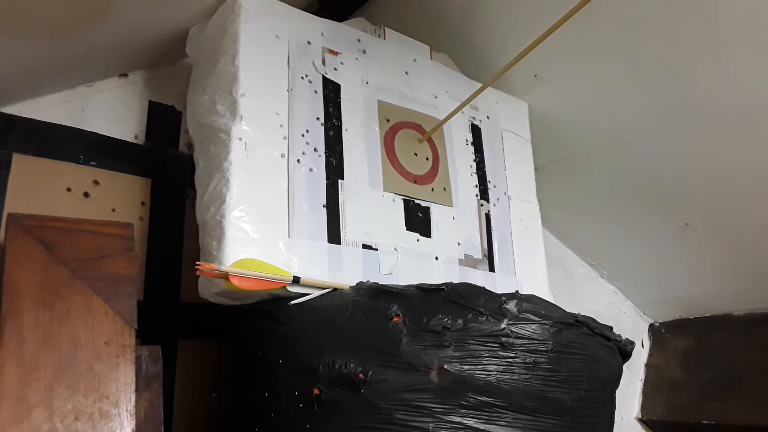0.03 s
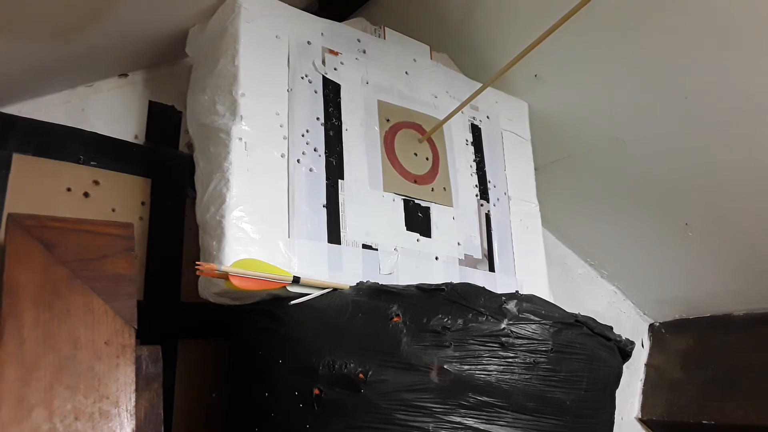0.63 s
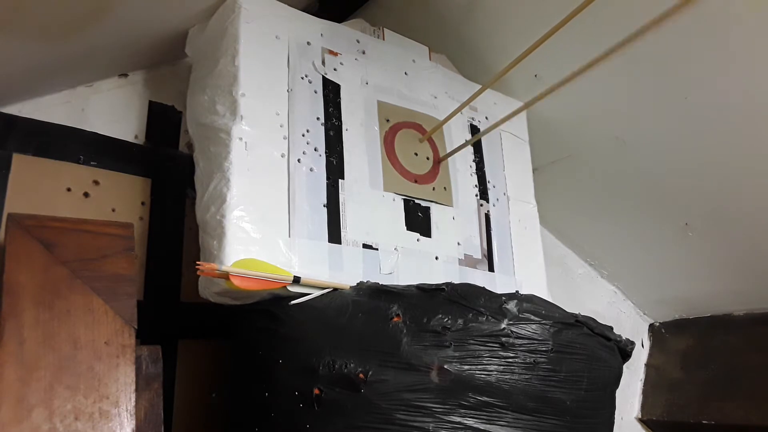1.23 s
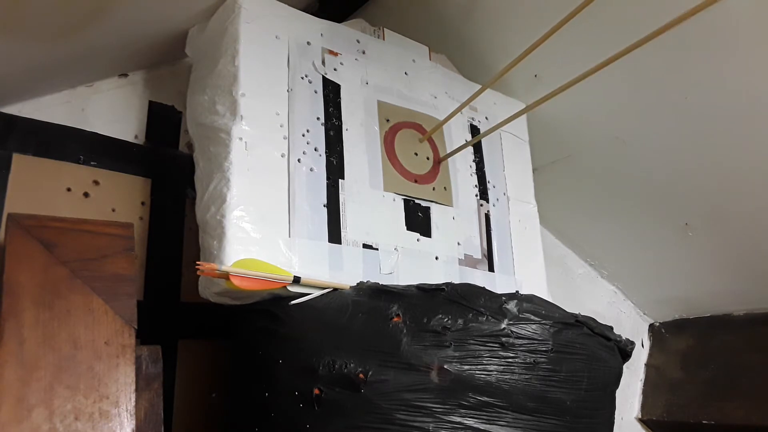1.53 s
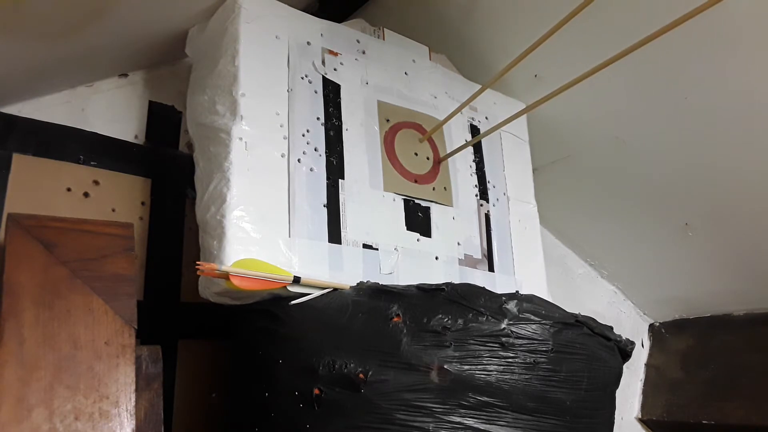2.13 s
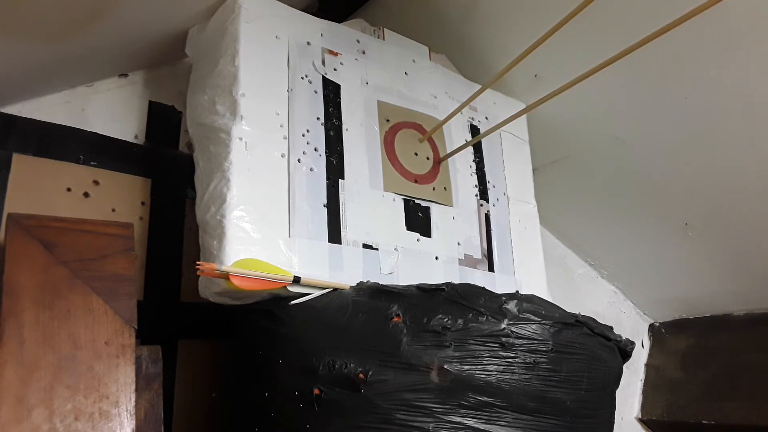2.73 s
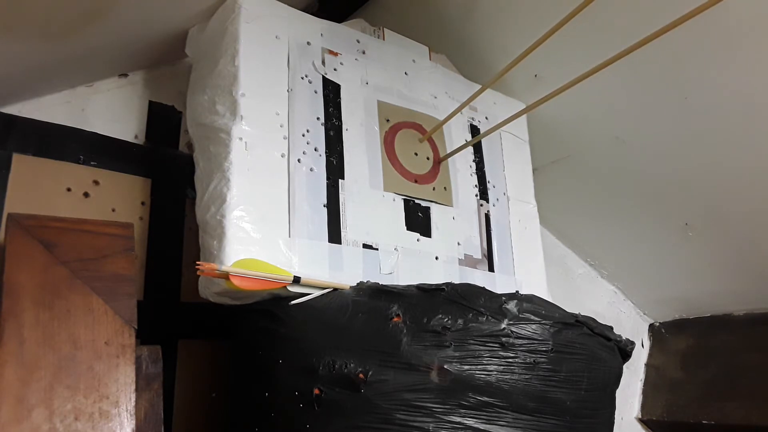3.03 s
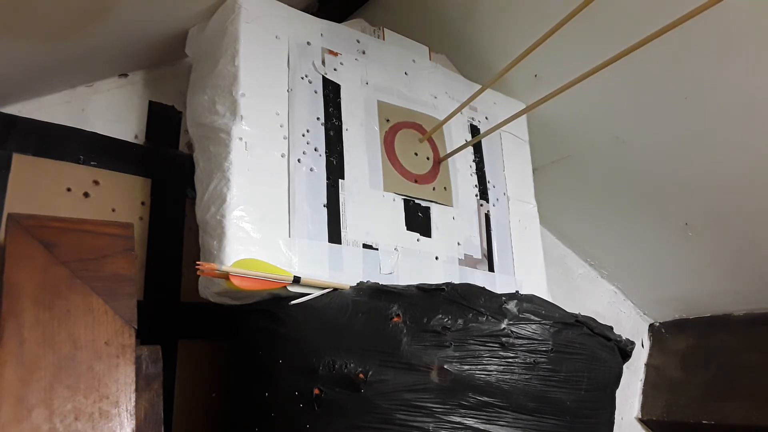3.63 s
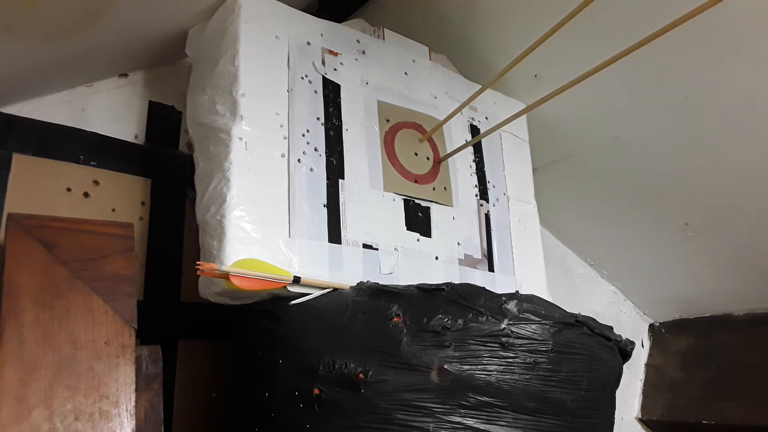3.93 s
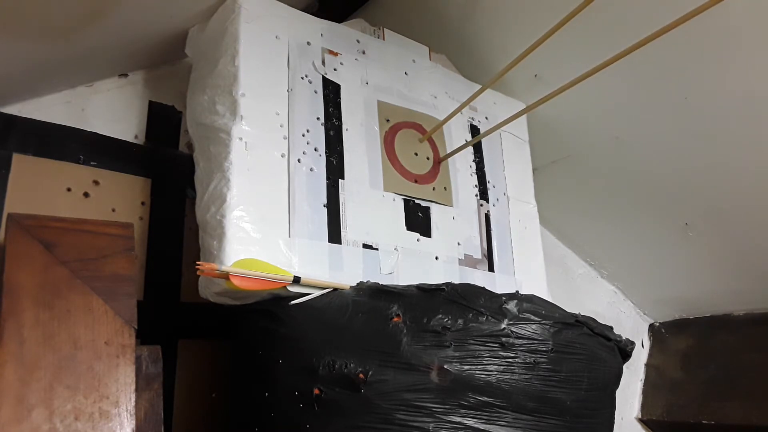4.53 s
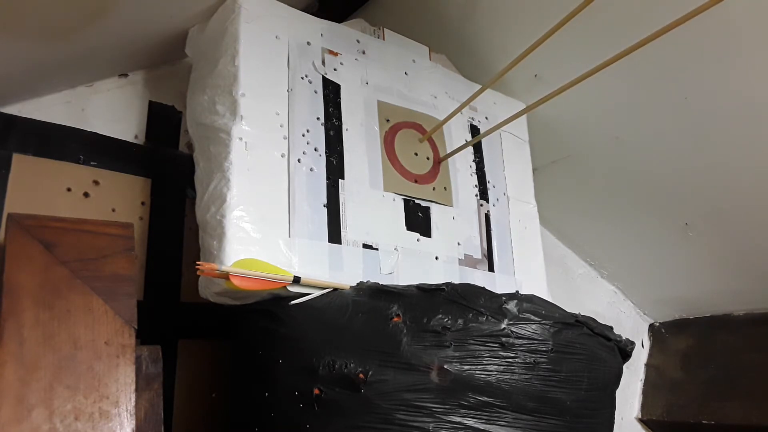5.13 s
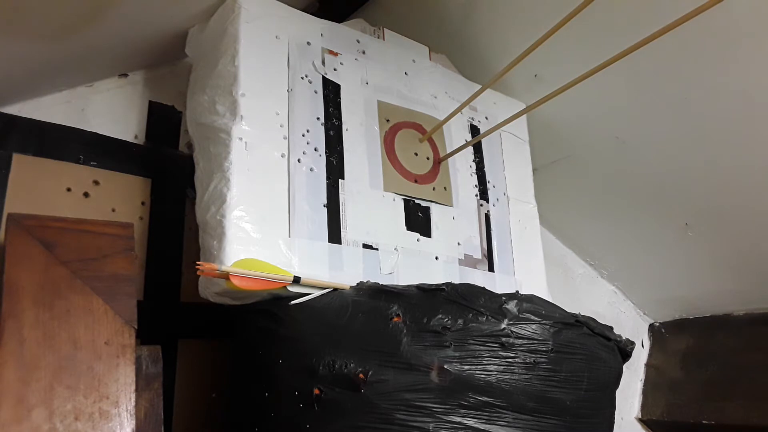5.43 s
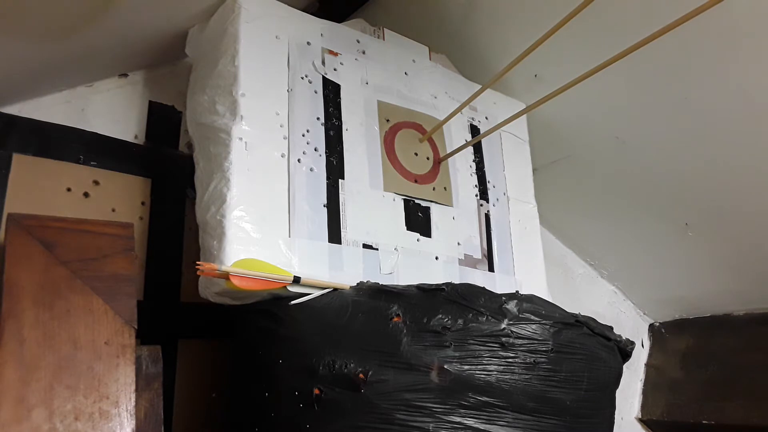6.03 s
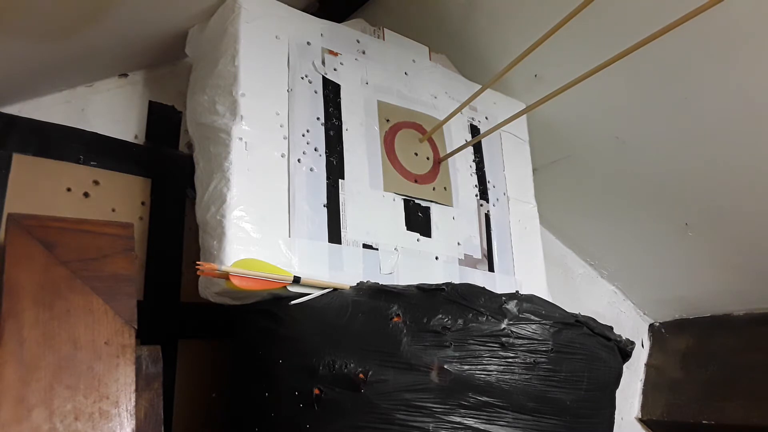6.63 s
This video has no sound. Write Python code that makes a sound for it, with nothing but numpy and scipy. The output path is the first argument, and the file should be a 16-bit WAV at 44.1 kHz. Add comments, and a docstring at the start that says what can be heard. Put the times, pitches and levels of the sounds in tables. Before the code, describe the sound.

A small loft is quiet, with only a low hush and a faint electronic hiss and high whine. At about 0.9 seconds a bow is released across the room: the string thumps and rings, and the arrow scrapes off with a short bright swish. Just after 1 second it punches through paper into a foam block beside the microphone, a sharp crack and thud that is by far the loudest sound. The room booms briefly and the shaft quivers for a moment. Small ticks follow, and sleeves rustle faintly around 2 seconds and on and off afterwards. The bow takes a light clacking knock at about 3.3 seconds, and a wooden board is knocked at about 4.3 seconds. Very soft, low footsteps fall on the floorboards from about 3.5 seconds, mostly between 6 and 7 seconds, barely above the hush.

```python
"""An arrow is shot across a small loft into a foam block right beside the microphone.
The string thumps and rings; the shaft scrapes off the bow, flies, punches the paper face and quivers.
The blow makes the gain control duck. Then sleeves rustle, gear knocks and soft steps cross the boards,
over the low hush of the house and a faint electronic hiss and whine."""
import sys
import numpy as np
from scipy import signal
from scipy.fft import rfft, irfft
from scipy.io import wavfile
from scipy.ndimage import uniform_filter1d, minimum_filter1d

SR = 44100
rng = np.random.default_rng(int(sys.argv[2]) if len(sys.argv) > 2 else 0)


def dump(signal):
    """Clip the signal to [-1, 1] and save it as 16-bit WAV at the path in sys.argv[1]."""
    limited = np.clip(np.atleast_2d(signal).T, -1, 1)
    pcm = np.round(limited * 32767).astype(np.int16)
    wavfile.write(sys.argv[1], SR, pcm)


N = 304290
T = np.arange(N) / SR
RELEASE_S, HIT_S = .907, 1.0455


def undb(db):
    """Decibels to gain."""
    return 10 ** (np.asarray(db) / 20)


def unit(x):
    """Scale to rms 1."""
    return x / np.sqrt(np.mean(x ** 2))


def convolve(x, response):
    """Pass a sound through an impulse response."""
    return signal.fftconvolve(x, response)[:N]


def colour(x, points, size=4096):
    """Minimum-phase EQ through (Hz, dB) points."""
    hz, db = np.transpose(points)
    f = np.maximum(np.fft.rfftfreq(size, 1 / SR), 1)
    curve_db = np.interp(np.log(f), np.log(hz), db)
    cepstrum = irfft(np.log(undb(curve_db)))
    cepstrum[1:size // 2] *= 2
    cepstrum[size // 2 + 1:] = 0
    return convolve(x, irfft(np.exp(rfft(cepstrum))))


def shaped_noise(points):
    """White noise through an EQ of (Hz, dB) points."""
    return colour(rng.standard_normal(N), points)


def band(hz, width_hz, size=N, order=1):
    """Noise in one resonance, rms 1; a higher order has steeper skirts."""
    resonance = signal.iirpeak(hz, hz / width_hz, fs=SR)
    noise = rng.standard_normal(size)
    for _ in range(order):
        noise = signal.lfilter(*resonance, noise)
    return unit(noise)


def flicker(rate_hz, depth_db):
    """A gain that wanders at random."""
    knots = np.arange(0, N / SR + 1, 1 / rate_hz)
    return undb(depth_db * np.interp(T, knots, rng.standard_normal(len(knots))))


def burst(start_s, decay_s):
    """An envelope that jumps up and dies away."""
    return (T >= start_s) * np.exp(-np.clip((T - start_s) / decay_s, 0, 50))


def envelope(start_s, attack_s, length_s, release_s):
    """Rises, holds until its length is over, then dies away."""
    t = T - start_s
    return np.clip(t / attack_s, 0, 1) * np.exp(-np.clip((t - length_s) / release_s, 0, 50))


def strike(start_s, modes, contact_s, swell_s=.00054):
    """A half-sine push rings (Hz, dB, t60 s) modes that swell in; a longer contact is duller."""
    t = T[:SR]
    ring = sum(undb(db - 60 * t / t60) * np.sin(2 * np.pi * hz * t) for hz, db, t60 in modes)
    push = np.sin(np.pi * np.clip((T - start_s) / contact_s, 0, 1))
    return convolve(push / push.sum(), ring * (1 - np.exp(-t / swell_s)))


def tick(start_s, hz, decay_s):
    """A small dry contact: a burst of noise in one broad resonance."""
    return burst(start_s, decay_s) * np.resize(band(hz, .99 * hz, size=16384, order=2), N)


def house_tone(level_db=-70.5, rise_db_per_s=.38):
    """The low hush of the house, slowly creeping up."""
    # Room tone spectrum. Each row: frequency in Hz, relative level in dB.
    spectrum = [(15, -24.5), (35, -7.5), (62, -3.5), (105, 2), (160, -6), (280, -11.5), (500, -18.5),
                (1000, -28), (2000, -31.5), (4000, -39.5), (8000, -57.5)]
    return undb(level_db + rise_db_per_s * T) * unit(shaped_noise(spectrum))


def whistle(hz, wander_hz):
    """A thin tone whose pitch trembles, rms 1."""
    drift = unit(uniform_filter1d(rng.standard_normal(N), size=256))
    return np.sqrt(2) * np.sin(2 * np.pi * np.cumsum(hz + wander_hz * drift) / SR)


def electronics(pulse_hz=90.3):
    """Steady circuit hiss and two thin whistles; a buzz comes and goes around the upper one."""
    # Hiss spectrum. Each row: frequency in Hz, relative level in dB.
    spectrum = [(1500, -20), (5000, -18), (6800, -15), (7900, -1), (8600, 4.5), (9800, -12), (11100, -7),
                (12000, -17), (12900, -8), (13600, -11), (15700, -16.5)]
    # The whistles. Each row: pitch in Hz, wander in Hz, level in dB.
    whistles = [(8606, 28, -76.5), (12800, 60, -89.5)]
    # Spells of buzzing. Each row: start in seconds, end in seconds.
    spells = [(1.74, 2.0), (3.52, 3.75), (3.82, 4.06), (6.04, 6.27), (6.33, 6.56), (6.60, 6.82)]
    # Partials of the buzz. Each row: frequency in Hz, level in dB.
    partials = [(12658, -79), (12925, -79.5), (13205, -90.5), (13290, -79)]
    hiss = undb(-78.5) * unit(shaped_noise(spectrum))
    whine = sum(undb(db) * whistle(hz, wander) for hz, wander, db in whistles)
    gate = np.any([(T > start) & (T < end) for start, end in spells], axis=0)
    buzz = sum(undb(db) * flicker(25, depth_db=-4.5) * np.sin(2 * np.pi * hz * T) for hz, db in partials)
    pulsing = .8 + .6 * np.sin(2 * np.pi * pulse_hz * T)
    return hiss + whine + gate * pulsing * buzz


def bow_release(nock_after_s=.0078):
    """The string snaps forward and rings, the bow jolts and the nock clicks free."""
    # Modes of bow and string. Each row: frequency in Hz, level in dB, t60 in seconds.
    modes = [(155.95, -41, 0.068), (204.9, -38.5, .1), (309, -46.5, .7), (390, -44, 0.12), (538, -44, .6),
             (803, -44.5, 0.66), (1080, -49.5, 0.18)]
    string = strike(RELEASE_S, modes, contact_s=.00069, swell_s=.0035)
    thump = undb(-42) * band(205, 130, order=2) + undb(-47) * band(420, 900, order=2)
    click = undb(-41) * tick(RELEASE_S + nock_after_s, hz=10890, decay_s=.0043)
    return string + burst(RELEASE_S, .037) * thump + click


def arrow_flight(slide_s=.0215):
    """The shaft slides over the rest, the vanes brush past it and the arrow rushes through the air."""
    scrape = shaped_noise([(300, -1.5), (1400, -1.5), (2000, -5), (4000, -.5), (7500, 4.5), (15000, -.5)])
    vanes_s = RELEASE_S + slide_s
    shaft = undb(-43) * envelope(RELEASE_S, attack_s=.008, length_s=slide_s, release_s=.0055)
    vanes = undb(-31) * envelope(vanes_s, attack_s=.004, length_s=.015, release_s=.0045)
    airborne = envelope(vanes_s, attack_s=.05, length_s=HIT_S - vanes_s, release_s=.002)
    friction = (shaft + vanes + undb(-59.5) * airborne) * flicker(700, depth_db=2.5)
    rush = undb(-61) * airborne * band(300, 500, order=2)
    return friction * scrape + rush


def tear(start_s, size):
    """A very short rip, equally strong at all frequencies."""
    phases = 2 * np.pi * rng.random(size // 2 + 1)
    rip = unit(irfft(np.exp(1j * phases)))
    start = int(start_s * SR)
    return np.pad(rip, (start, N - start - size))


def impact(blow_db=.05, brake_after_s=.0027):
    """The point tears through paper, the foam brakes it with a thud and the loft booms."""
    # Modes of the foam block on its stand. Each row: frequency in Hz, level in dB, t60 in seconds.
    block_modes = [(70.2, -14, 0.085), (125, -16, 0.037), (168, -12, 0.049), (230, -4, .03),
                   (271, -6.5, .035), (344.8, -15, 0.061), (473, -18, 0.057), (602, -17, 0.069),
                   (760, -22, 0.064), (862, -22, 0.038), (1033, -29, .05), (1324, -25, 0.045)]
    # Standing waves of the loft. Each row: frequency in Hz, level in dB, t60 in seconds.
    room_modes = [(100, -34.5, 0.49), (160, -35, 0.49), (220, -38.5, 0.83), (269.2, -36, 0.45),
                  (404, -43, 0.65)]
    paper_eq = [(300, .5), (800, 5), (1300, 2), (2000, 2), (2900, 6.5), (4000, 5.5), (5200, 2.5),
                (6600, 5), (8000, 1), (15000, -2)]
    brake_s = HIT_S + brake_after_s
    crack = undb(-8.5) * colour(tear(HIT_S, size=96), paper_eq)
    # Foam cells go on crackling as the shaft sinks in.
    crunch = undb(-26.5) * burst(brake_s, .009) * flicker(1600, depth_db=4.5) * shaped_noise(paper_eq)
    # The face is first dented inwards, then springs back and rings.
    dent = -undb(-6.5) * np.sin(np.pi * np.clip((T - HIT_S) / .0036, 0, 1))
    thud = strike(brake_s, block_modes, contact_s=.0008)
    boom = strike(brake_s, room_modes, contact_s=.0035, swell_s=.02)
    return undb(blow_db) * (crack + crunch + dent + thud) + boom


def quiver(swing_hz=60):
    """The swinging shaft rubs in its hole, ever less, and louder where it slips."""
    # Slips against the foam. Each row: start in seconds, length in seconds, level in dB.
    slips = [(1.066, .012, -38), (1.131, 0.0327, -45.5)]
    slipping = sum(undb(db) * envelope(start, attack_s=.009, length_s=length, release_s=.007)
                   for start, length, db in slips)
    fading = undb(-56) * burst(HIT_S, decay_s=.17)
    swings = 1 + .5 * np.sin(2 * np.pi * swing_hz * T)
    rub = shaped_noise([(300, 1), (1500, 2), (4000, 2), (8000, -3), (15000, -1.5)])
    return (fading + slipping) * swings * rub


def rustle(settle_ratio=1.549):
    """As the archer moves, cloth fibres catch and slip in a fine hiss over a duller shuffle."""
    # Movements. Each row: peak time in seconds, build-up in seconds, hiss in dB, shuffle in dB.
    moves = [(1.269, .07, -76, -63), (1.87, 0.072, -68, -82), (2.119, 0.1, -63, -91),
             (2.331, 0.03, -71.5, -89), (2.64, 0.31, -77, -90), (3.42, .18, -77, -76),
             (4.4, 0.17, -75, -70.5), (4.9, 0.21, -71, -81.5), (6.68, 0.186, -83.5, -84)]
    fibres = shaped_noise([(200, -2), (800, -6), (2500, -6.5), (5000, -5.5), (7800, 3.5),
                           (10000, -.5), (15000, -8)])
    hiss_gain, shuffle_gain = 0, 0
    for peak_s, build_s, hiss_db, shuffle_db in moves:
        width_s = np.where(T < peak_s, build_s, build_s * settle_ratio)
        speed = np.exp(-((T - peak_s) / width_s) ** 2)
        hiss_gain += undb(hiss_db) * speed
        shuffle_gain += undb(shuffle_db) * speed
    hiss = hiss_gain * flicker(90, depth_db=2) * fibres
    shuffle = shuffle_gain * flicker(20, depth_db=1) * band(550, 490)
    return hiss + shuffle


def gear_ticks():
    """Shaft and gear make small, scattered contacts."""
    # Each row: start in seconds, level in dB, centre in Hz, decay in seconds.
    ticks = [(1.247, -55.5, 7860, .004), (1.294, -51, 2010, 0.0043), (1.99, -69.5, 640, 0.057),
             (4.789, -71.5, 1800, 0.0275), (5.708, -70, 7550, 0.0122), (6.187, -72.5, 2500, .008)]
    return sum(undb(db) * tick(start, hz, decay) for start, db, hz, decay in ticks)


def limb_bumps():
    """The bow limb is knocked and touches again: each time a clack, a bright tick and its ring."""
    # Modes of the limb. Each row: frequency in Hz, relative level in dB, t60 in seconds.
    modes = [(227.9, 4, 0.2174), (401.8, -5, 0.082), (733, -9.5, 0.14), (799.5, -5, 0.081),
             (928, -17, 0.06), (2170, -15, 0.04)]
    # The two contacts. Each row: start in seconds, gain in dB.
    bumps = [(3.293, -34), (3.367, -51.5)]
    knocks = 0
    for start_s, db in bumps:
        clack = undb(-19.5) * tick(start_s - .002, hz=880, decay_s=.018)
        click = undb(-23.5) * tick(start_s, hz=3080, decay_s=.008)
        ring = strike(start_s, modes, contact_s=.00016, swell_s=.018)
        knocks += undb(db) * (clack + click + ring)
    return knocks


def footfalls():
    """Soft steps push on the floorboards and ring two low modes."""
    # Each row: start in seconds, gain in dB.
    steps = [(3.575, -53.5), (4.368, -59.5), (5.69, -58.5), (6.098, -49.5), (6.244, -51.5), (6.771, -45),
             (6.82, -48)]
    modes = [(97.4, -4, .13), (120, -2.5, .18)]
    return sum(undb(db) * strike(start, modes, contact_s=.00365, swell_s=.0048) for start, db in steps)


def board_knock(start_s=4.2895):
    """A wooden board takes one hard knock and rings briefly."""
    # Modes of the board. Each row: frequency in Hz, relative level in dB, t60 in seconds.
    modes = [(310, -8, .06), (430, -6, .05), (544, -3, .06), (690, -6, .04), (840, -5, .04), (937, -5, .05),
             (1082, -9, .04), (1427, -16, .035)]
    ring = undb(-38) * strike(start_s, modes, contact_s=.0003, swell_s=.001)
    clack = undb(-52.5) * tick(start_s, hz=693, decay_s=.01)
    click = undb(-69) * tick(start_s, hz=5640, decay_s=.015)
    return ring + clack + click


def loft_response(bands=10, panel_hz=330):
    """A few close echoes, then a dense tail that lasts longest in the upper bass."""
    # Reverb tail. Each row: frequency in Hz, level in dB, t60 in seconds.
    reverb = [(59.72, -11.5, 0.13), (201, -14.5, 0.56), (500, -4.5, 0.17), (1500, -2, 0.13),
              (3988.5, -3.5, 0.17), (7683, -2.5, 0.13), (15610, -7.5, .12)]
    # Echoes off the sloping ceiling and walls. Each row: delay in seconds, level in dB.
    echoes = [(.0058, -10.5), (.0083, -12.5), (0.0148, -11.5), (0.0209, -13), (.0255, -13)]
    t = T[:SR // 2]
    hz, db, t60 = np.transpose(reverb)
    log_f = np.log(np.maximum(np.fft.rfftfreq(len(t), 1 / SR), 1))
    centres = np.log(np.geomspace(hz[0], hz[-1], bands))
    spectrum = rfft(rng.standard_normal(len(t)))
    fade_in = np.clip((t - .004) / .012, 0, 1)
    tail = 0
    for centre, share in zip(centres, np.eye(bands)):
        noise = irfft(spectrum * np.interp(log_f, centres, share), len(t))
        decay = fade_in * undb(-60 * t / np.interp(centre, np.log(hz), t60))
        gain = undb(np.interp(centre, np.log(hz), db))
        tail += gain * noise * decay / np.linalg.norm(decay)
    early = sum(undb(level) * signal.unit_impulse(len(t), int(delay * SR)) for delay, level in echoes)
    # Thin panels give way to the bass instead of reflecting it.
    return tail + signal.lfilter(*signal.butter(1, panel_hz, "high", fs=SR), early)


def gain_control(x, limit_db=-16.5, hold_s=.7, fall_db_per_s=80, rise_db_per_s=50, size=64):
    """A peak over the limit makes the gain slide down, wait and creep back."""
    peaks = np.maximum.reduceat(np.abs(x), np.arange(0, N, size))
    wanted_db = np.minimum(0, limit_db - 20 * np.log10(peaks + 1e-9))
    step_s = size / SR
    held = int(hold_s / step_s)
    wanted_db = minimum_filter1d(wanted_db, held, origin=(held - 1) // 2, mode="nearest")
    gain_db = [0]
    for goal in wanted_db[1:]:
        lowest, highest = gain_db[-1] - fall_db_per_s * step_s, gain_db[-1] + rise_db_per_s * step_s
        gain_db.append(min(max(goal, lowest), highest))
    return x * undb(np.interp(T, np.arange(len(peaks)) * step_s, gain_db))


def scene():
    """The target is close, the archer across the room; both feed the loft's reverb."""
    target = impact() + quiver()
    shot = bow_release() + arrow_flight()
    archer = shot + limb_bumps() + board_knock() + gear_ticks() + footfalls() + rustle()
    hush = house_tone()
    reverb = convolve(target + undb(-9) * archer, loft_response())
    return (target + undb(-3.5) * archer + reverb + hush)[None]


def record(dry, top_hz=15700):
    """The microphone chain: port resonance, circuit noise, rounded peaks, ducking and a top cut."""
    # Treble resonance of the microphone's sound port. Each row: frequency in Hz, gain in dB.
    port_eq = [(1000, 1), (3000, -2.5), (5200, -4), (6300, 0), (7100, 6.5), (8000, 15), (8600, 11.5),
               (9300, 2.5), (10500, -1), (12000, -6.5), (15500, -4.5)]
    picked_up = colour(dry[0], port_eq) + electronics()
    rounded = .8 * np.tanh(picked_up / .8)
    top_cut = signal.ellip(8, .2, 70, top_hz, fs=SR, output="sos")
    return signal.sosfilt(top_cut, gain_control(rounded))[None]


dry = scene()
out = record(dry)
dump(out)
```